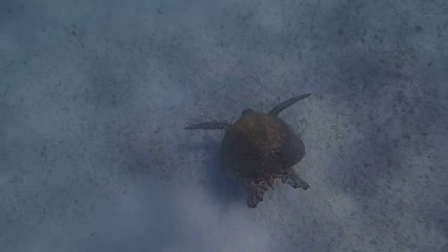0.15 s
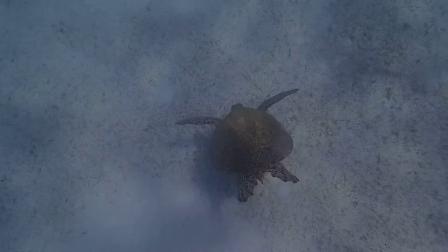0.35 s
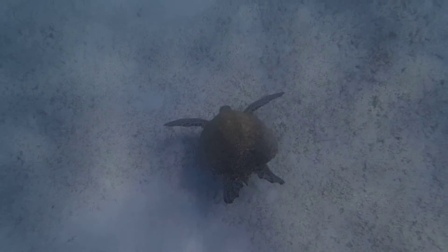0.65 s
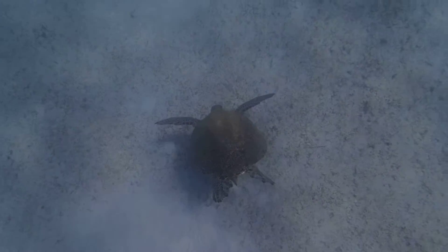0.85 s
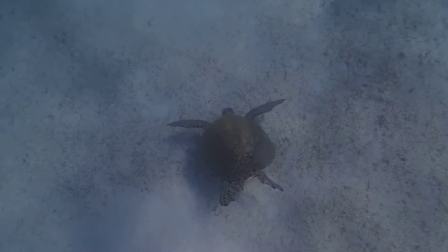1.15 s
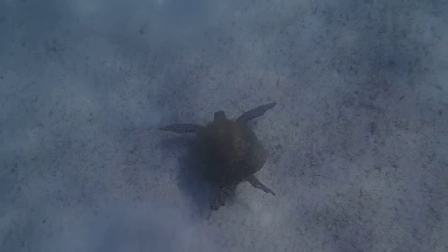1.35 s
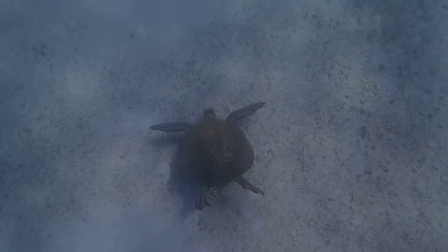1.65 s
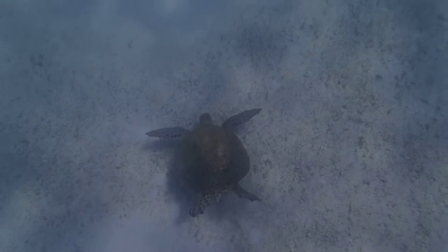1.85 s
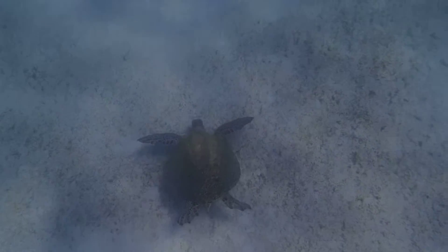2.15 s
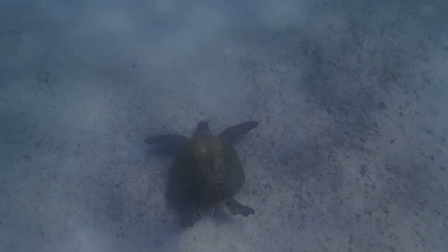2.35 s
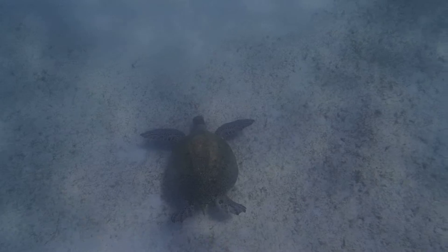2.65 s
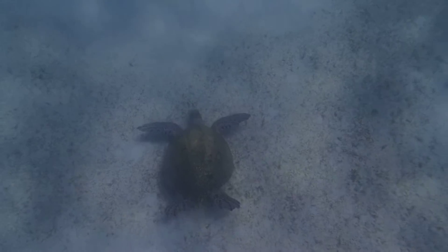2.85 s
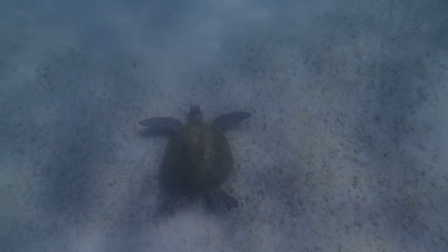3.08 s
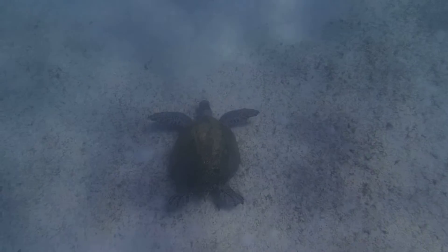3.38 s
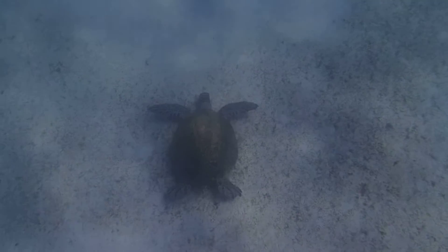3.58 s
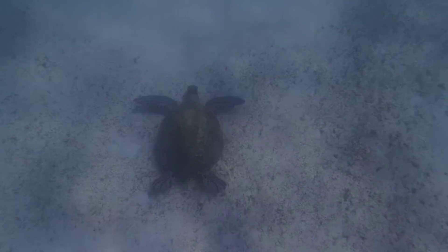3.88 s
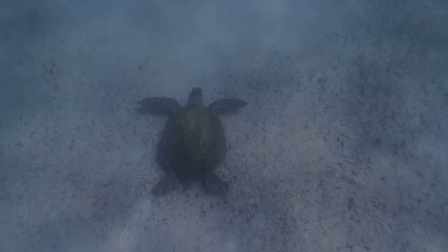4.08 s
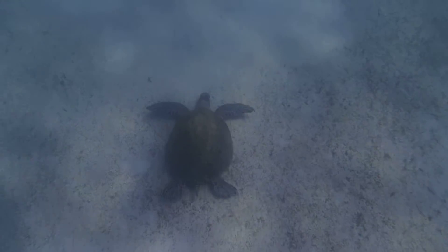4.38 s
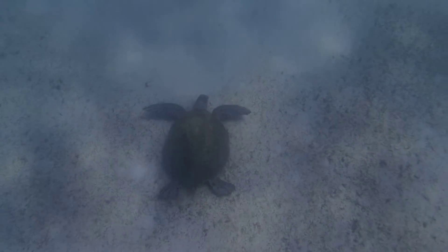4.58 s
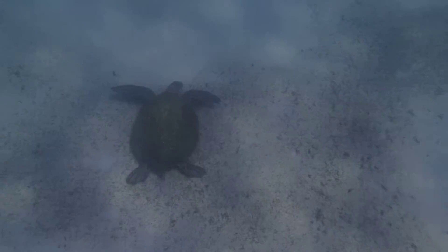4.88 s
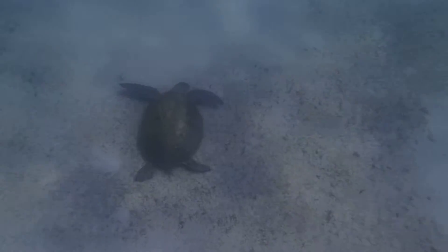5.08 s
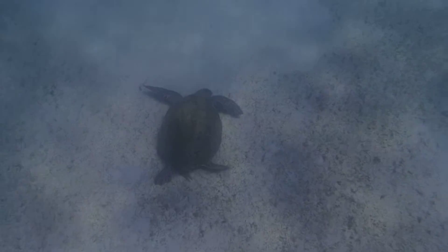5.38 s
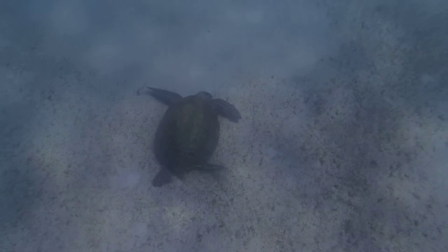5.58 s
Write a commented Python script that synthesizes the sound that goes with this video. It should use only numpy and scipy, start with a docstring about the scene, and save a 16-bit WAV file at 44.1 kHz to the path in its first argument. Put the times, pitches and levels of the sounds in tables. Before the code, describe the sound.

Underwater, a distant boat motor rumbles steadily while reef creatures crackle and snap, a camera ticks rapidly, and the housing is bumped.

```python
"""Under water, a small camera in a sealed housing drifts. A far boat motor is a broad, lumpy rumble of noise
bands; reef animals crackle and snap as clicks that ring; bubbles ring at one pitch. A part inside the camera
ticks about 15 times a second; the hand bumps the housing (damped pushes) and creaks it (stick-slip clicks).
Two microphone cavities colour all but the bumps, creaks and hiss; a limiter ducks the whole mix on loud peaks."""
import sys
import numpy as np
from scipy import signal
from scipy.fft import rfft, irfft
from scipy.io import wavfile
from scipy.ndimage import minimum_filter1d

SR = 44100
rng = np.random.default_rng(int(sys.argv[2]) if len(sys.argv) > 2 else 0)


def waveform_to_disk(signal):
    """Save audio, clipped to [-1, 1], as 16-bit WAV at the path in sys.argv[1]."""
    frames = np.transpose(np.atleast_2d(signal))
    scaled = np.clip(frames, -1, 1) * 32767
    samples = np.round(scaled).astype(np.int16)
    wavfile.write(sys.argv[1], SR, samples)


N = 252644

# Microphone noise spectrum. Each row: frequency in Hz, relative level in dB.
HISS_SPECTRUM = [(2060, -44), (3500, -6), (4600, -23), (5090, -13), (8740, -14.5), (15500, -20.5)]
HISS_RMS_DB = -54

# Motor rumble spectrum. Each row: frequency in Hz, relative density in dB per Hz.
RUMBLE_SPECTRUM = [(25, -17), (70, -3), (140, -5.5), (370, 2.5), (670, -1.5), (950, -13), (1500, -22),
                   (2500, -31.5), (5000, -80)]
# Left-right likeness of the rumble. Each row: frequency in Hz, correlation (1 = same).
RUMBLE_LIKENESS_AT_HZ = [(60, 0.87), (200, 0.95), (400, 0.91), (1000, 1)]
# Motor rumble as the swell carries it. Each row: time in seconds, level in dB.
MOTOR_SWELL = [(0, -23), (.45, -21), (.85, -23.5), (1.05, -19.5), (1.6, -21.5), (2.5, -24), (3.1, -23),
               (3.3, -20.5), (3.65, -24), (4.2, -21), (5.2, -23), (5.73, -24.5)]

# Level falls slowly; FOLLOWS is the share of the swell's swing.
CRACKLE_DB, CRACKLE_FADE_DB_PER_S, CRACKLE_FOLLOWS = -38.5, 1.5, 0.23

# Small bubbles. Each row: start in seconds, peak in dB, pitch in Hz.
BUBBLES = [(1.0916, -24.5, 1940), (1.433, -22, 1260), (3.402, -25, 2245), (3.4162, -23.5, 2110),
           (4.108, -20, 2080)]
BUBBLE_T60_S = 0.036

# Housing creaks. Each row: start in seconds, length in seconds, first slips per second,
# last slips per second, click level in dB.
HOUSING_CREAKS = [(1.787, 0.043, 1500, 780, -34), (3.827, 0.026, 2300, 630, -29.5)]
CREAK_HZ, CREAK_T60_S = 11400, 0.0017
SLIP_UNEVEN = 0.64   # spread of the log slip rate

TICK_FIRST_S, TICKS_PER_S = .0523, 14.983
# Modes of the ticking part. Each row: frequency in Hz, relative level in dB, t60 in seconds.
TICK_PART_MODES = [(1268, 18.5, 0.018), (2020, 13.5, 0.012), (2540, 5, 0.021), (5560, 0, 0.004)]
# Strength of the tick's low knock. Each row: time in seconds, level in dB.
TICK_KNOCK_LEVEL = [(0, -16), (.8, -14.5), (2, -28), (2.2, -10), (2.5, -12.5), (2.65, -29), (3.1, -39),
                    (3.3, -8.5), (3.72, -16.5), (3.9, -26), (4.06, -15), (5.73, -15.5)]
TICK_EDGE_DB, TICK_SCATTER_DB, TICK_CONTACT_HZ = -10.5, 2.5, 5460   # contact is soft above this
# The bright edge is damped from EDGE_FADE_FROM_S on, down to a floor.
EDGE_FADE_FROM_S, EDGE_FADE_DB_PER_S, EDGE_FLOOR_DB = 0.59, 26, -31

# Single snaps. Each row: start in seconds, crack peak in dB, pitch in Hz.
SINGLE_SNAPS = [(0.1237, -27, 2180), (0.3557, -7, 1900), (0.685, -33, 2170), (0.907, -18.5, 1970),
                (0.9872, -23, 1860), (1.1, -25.5, 2240), (1.1197, -18.5, 1760), (1.199, -22, 2170),
                (1.2241, -16.5, 1810), (1.268, -26.5, 2610), (1.369, -16, 1640), (1.413, -23, 1600),
                (1.5234, -15.5, 1860), (1.6215, -10, 1960), (1.715, -24, 1790), (1.9004, -16, 1700),
                (1.9487, -17, 1800), (1.9919, -6, 1600), (2.1158, -19, 1630), (2.1335, -17, 1680),
                (2.3748, -22.5, 1790), (2.4497, -16.5, 1530), (2.5239, -14.5, 2030), (2.5603, -18.5, 1600),
                (2.6085, -17, 1540), (2.7473, -15.5, 1590), (2.774, -20, 1940), (2.8652, -18.5, 1640),
                (2.927, -15.5, 1640), (2.953, -10, 1850), (2.983, -16, 1450), (3.013, -20, 1830),
                (3.035, -19, 1830), (3.2613, -19.5, 1790), (3.299, -20, 1740), (3.37, -24, 1720),
                (3.4918, -10, 1700), (3.618, -17, 1800), (4.033, -20, 1840), (4.07, -23.5, 2200),
                (4.098, -19, 1490), (4.2737, -20.5, 3170), (4.503, -26.5, 2380), (4.519, -18.5, 1840),
                (4.533, -25, 1800), (4.7256, -19.5, 1510), (5.106, -22, 1530), (5.211, -27.5, 2780),
                (5.2264, -27, 2570), (5.2836, -19, 1970), (5.5036, -20, 1500), (5.5316, -17.5, 1680),
                (5.664, -20, 1550)]
SNAP_KNOCK_DB, SNAP_TOP_HZ = -2, 13700   # knock re crack; the water dulls the top
SNAP_BITE_DB = -21   # white spit, grows with the square of the snap's height

# Bumps on the housing. Each row: time in seconds, push peak in dB, pulse in Hz (minus for a pull),
# left over right in dB.
HOUSING_BUMPS = [(0.194, -9, 159, 9), (0.3571, 0.5, -770, 9), (0.589, -5, 500, 12), (1.1425, -6, -300, 3),
                 (2.0194, 1.5, 250, 9), (2.0842, -5.5, 108, 3.5), (2.952, -9, -620, -6),
                 (3.093, -7, 138, 1), (3.2065, -15, 114, 0), (3.6315, -12, 235, 0), (3.771, -1, 401, -18),
                 (3.79, -4.5, 194, -5), (3.8389, -9, 182, 10), (3.849, 1.5, 216, -32),
                 (3.9822, -5.5, 85, 37), (4.171, -6.5, -150, -2), (4.2984, 7.5, -270, 8),
                 (4.3916, -7, -130, -6), (4.612, 3.5, -350, 42), (4.6543, 2.5, -350, 10),
                 (4.7277, 7.5, 290, 7), (4.8886, -3, -170, 5), (4.9242, -0.5, 256, 41),
                 (5.0418, -0.5, -260, 14), (5.4483, -3, -450, 3), (5.516, 4, 216, 9.5),
                 (5.568, 6.5, 256, 10), (5.6649, 3, 261.5, 10)]
BUMP_TAP_DB, BUMP_TAP_HZ = -12, 400   # contact tap re push
REBOUND_SLOWS, REBOUND_TURNS = 0.51, 0.39   # the swing back drags; decay in turns

# Microphone cavities, peaks and dips. Each row: frequency in Hz, width in Hz, gain in dB.
LEFT_CAVITY = [(475, 17, -14), (673, 77, 11), (1760, 124, 5.5), (2340, 640, 4), (3010, 133, -13),
               (6350, 920, 13.5)]
RIGHT_CAVITY = [(528, 103, 9), (1012, 315, -12), (1345, 86, 9.5), (3900, 1800, 10.5), (4050, 136, -34),
                (4540, 420, 8), (5580, 1000, -10), (6320, 750, 12.5)]
# Phase between the cavities. Each row: frequency in Hz, left lead in radians.
LEFT_LEAD_RAD = [(420, .15), (600, .5), (850, .2), (1100, .5), (1400, .1), (4100, .1), (4700, -3.2),
                 (5800, -3.1), (9500, -.3), (16000, 0)]

LIMIT_DB, RELEASE_DB_PER_S, ATTACK_S, HOLD_S = -8.5, 80.5, 0.0004, 0.0025
CLIP_LEVEL, CUTOFF_HZ = 0.68, 16350


def from_db(db):
    """Amplitude factor of a level in dB."""
    return 10 ** (np.asarray(db) / 20)


def rms_one(x):
    """Scale to RMS 1."""
    return x / np.sqrt(np.mean(x ** 2) + 1e-20)


def peak_one(x):
    """Scale to peak 1."""
    return x / np.abs(x).max()


def columns_at(rows, times_s):
    """Interpolate the columns of a table over its first, time."""
    s, *columns = np.transpose(rows)
    return [np.interp(times_s, s, column) for column in columns]


def at_hz(points, hz):
    """Interpolate a two-column table over log frequency."""
    points_hz, values = np.transpose(points)
    return np.interp(np.log(hz), np.log(points_hz), values)


def drift(rate_per_s):
    """Slow chance at about this rate: noise through two equal poles at SR / 40; RMS 1."""
    r = np.exp(-80 * np.pi * rate_per_s / SR)
    white = rng.standard_normal(N // 40 + 2002)
    slow = signal.lfilter([1], [1, -2 * r, r * r], white)[2000:]   # drop the filter's start
    return np.interp(np.arange(N) / 40, np.arange(len(slow)), rms_one(slow))


def ring(clicks, hz, t60_s):
    """Two-pole resonator: a unit click starts a decaying sine of height 1."""
    r, w = from_db(-60 / (t60_s * SR)), 2 * np.pi * hz / SR
    return signal.lfilter([0, np.sin(w)], [1, -2 * r * np.cos(w), r * r], clicks + 1e-18)


def add(out, s, wave):
    """Mix a short wave in at time s."""
    i = round(s * SR)
    out[..., i:i + wave.shape[-1]] += wave[..., :N - i]


def burst(hz, t60_s, rattle_s):
    """An uneven contact, a short puff of noise, ringing at one pitch; peak 1."""
    t = np.arange(900) / SR
    rattle = rng.standard_normal(900) * t * np.exp(-t / rattle_s)
    return peak_one(ring(rattle, hz, t60_s))


def knock(hz, t60_s):
    """The low shove a contact gives the cavities: a smooth push rings a few cycles; peak 1."""
    t = np.arange(900) / SR
    push = np.sin(np.pi * np.minimum(t * 0.94 * hz, 1)) ** 2
    return peak_one(ring(np.diff(push, prepend=0), hz, t60_s))


def hiss():
    """Microphone noise, own in each channel: white noise shaped in frequency."""
    hz = np.arange(1, N // 2 + 2) * SR / N
    spectrum = rfft(rng.standard_normal((2, N))) * from_db(at_hz(HISS_SPECTRUM, hz))
    return from_db(HISS_RMS_DB) * rms_one(irfft(spectrum, N))


def rumble(level_db, shared_db, own_db):
    """Third-octave noise bands swell together and flutter apart, as the motor's sound takes many paths."""
    out = 0
    together = 2.18 * np.tanh(0.46 * drift(11.2) + 0.84 * drift(87.0))
    edges_hz = 25 * 2 ** (np.arange(24) / 3)
    white = rng.standard_normal((2, 2, N))   # neighbouring bands use different noise
    for k, (low_hz, high_hz) in enumerate(zip(edges_hz, edges_hz[1:])):
        band = signal.butter(2, [low_hz, high_hz], "band", fs=SR, output="sos")
        mid, side = signal.sosfilt(band, white[k % 2])
        hz = np.sqrt(low_hz * high_hz)
        alike = np.clip(at_hz(RUMBLE_LIKENESS_AT_HZ, hz), -1, 1)
        gain = from_db(at_hz(RUMBLE_SPECTRUM, hz) + shared_db * together + own_db * drift(26.0))
        out = out + gain * (np.sqrt(1 + alike) * mid + np.sqrt(1 - alike) * side * [[1], [-1]])
    return from_db(level_db) * rms_one(out)


def crackle(level_db, per_s, spread_db, cycles, top_hz, tilt_db_per_octave, reach=2):
    """Snaps at random, in clumps, each ringing a few neighbouring pitches; soft contacts dull the top."""
    sizes = from_db(spread_db * np.minimum(rng.exponential(1, N), 3)) * rng.choice([-1, 1], N)
    clumps_db = 4.0 * drift(25) + 3.0 * drift(3.0)
    born = rng.random(N) < per_s * from_db(clumps_db) / SR
    top_hz = min(top_hz, 15000)
    dealt = rng.integers(-2, 18, N)   # centre pitch number of each snap
    smear = rng.standard_normal((16, 44)) * np.hanning(44)   # a short rattle, not one click
    rings = 0
    for k, hz in enumerate(np.geomspace(850, top_hz, 16)):
        clicks = sizes * born * (abs(dealt - k) < reach)
        rattles = np.convolve(clicks, rms_one(smear[k]))[:N]
        rings = rings + from_db(tilt_db_per_octave * np.log2(hz / 800)) * ring(rattles, hz, cycles / hz)
    dulled = signal.sosfilt(signal.butter(2, top_hz, fs=SR, output="sos"), rings)
    return from_db(level_db) * rms_one(dulled)


def bubbles():
    """Each bubble rings briefly at one clear pitch."""
    out = np.zeros(N)
    for s, peak_db, hz in BUBBLES:
        add(out, s, from_db(peak_db) * burst(hz, BUBBLE_T60_S, 0.00049))
    return out


def creaks():
    """Plastic sticks and slips at a falling, uneven rate, by the left microphone; slips ring two modes."""
    clicks = np.zeros(N)
    for s, length_s, first_per_s, last_per_s, peak_db in HOUSING_CREAKS:
        t = np.arange(round(length_s * SR)) / SR
        uneven = np.exp(SLIP_UNEVEN * drift(400)[:len(t)])
        rate_per_s = np.interp(t, [0, length_s], [first_per_s, last_per_s]) * uneven
        slips = np.diff(np.floor(np.cumsum(rate_per_s) / SR), prepend=-1)   # one click per whole turn
        onset = np.minimum(1, 0.46 + t / 0.0042)
        add(clicks, s, from_db(peak_db + rng.normal(0, 1.2, len(t))) * slips * onset)
    rings = ring(clicks, CREAK_HZ, CREAK_T60_S) + 0.8 * ring(clicks, 6400, 0.00081)
    return rings * from_db([[0], [-14]])


def ticks():
    """One small part strikes on a clock: its own modes, soon damped, then a low knock."""
    out, times_s = np.zeros(N), np.arange(TICK_FIRST_S, N / SR, 1 / TICKS_PER_S)
    fading_db = TICK_EDGE_DB - EDGE_FADE_DB_PER_S * (times_s - EDGE_FADE_FROM_S)
    edges_db = np.clip(fading_db, EDGE_FLOOR_DB, TICK_EDGE_DB)
    soft = signal.butter(4, TICK_CONTACT_HZ, fs=SR, output="sos")
    contact = signal.sosfilt(soft, signal.unit_impulse(900))
    edge = peak_one(sum(from_db(db) * ring(contact, hz, t60_s) for hz, db, t60_s in TICK_PART_MODES))
    knocks_db, = columns_at(TICK_KNOCK_LEVEL, times_s)
    for s, edge_db, knock_db in zip(times_s, edges_db, knocks_db):
        add(out, s, from_db(edge_db) * edge)
        scattered_db = knock_db + rng.normal(0, TICK_SCATTER_DB)
        add(out, s + 0.00075, from_db(scattered_db) * knock(rng.uniform(665, 895), 0.014))
    return out


def snaps():
    """Each snap: a broad crack around its pitch, a low knock, a faint edge and a high bite."""
    out = np.zeros(N)
    for s, peak_db, hz in SINGLE_SNAPS:
        body = burst(hz, .007, .001)
        body = body + .7 * burst(1.4 * hz, .004, .001) + .7 * burst(.68 * hz, .006, .001)
        edge = burst(1.62 * hz, 0.0046, 0.0036)
        add(out, s, from_db(peak_db) * peak_one(body + 0.17 * edge))
        add(out, s, from_db(peak_db + SNAP_KNOCK_DB) * knock(870, 0.0073))
        add(out, s, from_db(2 * peak_db + SNAP_BITE_DB) * burst(7600, 0.00023, 0.0011))
    return signal.sosfilt(signal.butter(2, SNAP_TOP_HZ, fs=SR, output="sos"), out)


def bumps():
    """A push and its rebound: a cycle that rises fast and dies within the next, with a thin tap."""
    out = np.zeros((2, N))
    for s, peak_db, hz, pan_db in HOUSING_BUMPS:
        turns = np.arange(-1, 5, abs(hz) / SR)
        turns = turns / (1 + REBOUND_SLOWS * np.maximum(turns, 0))
        rise = np.exp(-(turns / 0.29) ** 2)
        decay = np.exp(-turns / REBOUND_TURNS) * np.maximum(1 - REBOUND_SLOWS * turns, 0)
        wave = -np.sign(hz) * np.sin(2 * np.pi * turns) * np.where(turns < 0, rise, decay)
        sides_db = peak_db + np.minimum([[pan_db], [-pan_db]], 0)   # nearer microphone: full push
        add(out, s - 1 / abs(hz), from_db(sides_db) * peak_one(wave))
        add(out, s, from_db(sides_db + BUMP_TAP_DB) * burst(BUMP_TAP_HZ, 0.0031, 0.00024))
    return out


def cavity(x, modes):
    """Microphone cavity: a chain of peaking filters, peaks and dips."""
    for hz, width_hz, gain_db in modes:
        a, w = from_db(gain_db / 2), 2 * np.pi * hz / SR
        alpha = np.pi * width_hz / SR
        x = signal.lfilter([1 + alpha * a, -2 * np.cos(w), 1 - alpha * a],
                           [1 + alpha / a, -2 * np.cos(w), 1 - alpha / a], x)
    return x


def scene():
    """All that comes through the cavities, plus what shakes the microphones directly, plus hiss."""
    t = np.arange(N) / SR
    rumble_db, = columns_at(MOTOR_SWELL, t)
    swing_db = rumble_db - rumble_db.mean()
    crackle_db = CRACKLE_DB - CRACKLE_FADE_DB_PER_S * t + CRACKLE_FOLLOWS * swing_db
    water = rumble(rumble_db, shared_db=2.23, own_db=1.5)
    # far; nearer, broad and sharp; a fine, high prickle
    water = water + crackle(crackle_db, per_s=450, spread_db=11.0, cycles=18.0, top_hz=4190,
                            tilt_db_per_octave=-1.5, reach=3)
    water = water + crackle(crackle_db - 6.5, per_s=70, spread_db=9.5, cycles=14.5, top_hz=5230,
                            tilt_db_per_octave=-4.0, reach=6)
    water = water + crackle(-58.5, per_s=60, spread_db=2.0, cycles=8.4, top_hz=14500,
                            tilt_db_per_octave=1.0, reach=3)
    water = water + bubbles() + ticks() + snaps()
    left, right = cavity(water[0], LEFT_CAVITY), cavity(water[1], RIGHT_CAVITY)
    hz = np.arange(1, N // 2 + 2) * SR / N
    left = irfft(rfft(left) * np.exp(1j * at_hz(LEFT_LEAD_RAD, hz)), N)   # cavities swing out of step
    return np.array([left, right]) + hiss() + creaks() + bumps()


def record(dry):
    """A linked limiter ducks fast, holds and recovers; what slips past is soft-clipped; the top is cut."""
    peak_db = 20 * np.log10(np.abs(dry).max(axis=0) + 1e-9)
    over_db = np.maximum(peak_db - LIMIT_DB, 0)
    hold = round(HOLD_S * SR)
    held_db = -minimum_filter1d(-over_db, size=hold, origin=(hold - 1) // 2)   # running maximum, looks back
    slope_db = RELEASE_DB_PER_S * np.arange(N) / SR
    duck_db = np.maximum.accumulate(held_db + slope_db) - slope_db   # linear release in dB
    r = np.exp(-1 / (ATTACK_S * SR))
    ducked = dry * from_db(-signal.lfilter([1 - r], [1, -r], duck_db))
    clipped = ducked / (1 + (ducked / CLIP_LEVEL) ** 8) ** (1 / 8)
    return signal.sosfilt(signal.cheby2(20, 70, CUTOFF_HZ, fs=SR, output="sos"), clipped)


dry = scene()
out = record(dry)
waveform_to_disk(out)
```